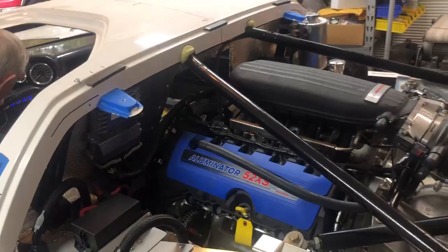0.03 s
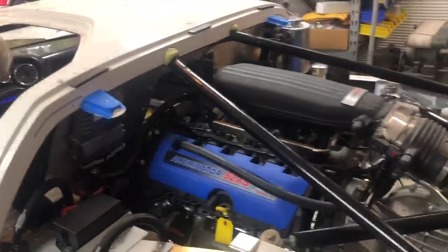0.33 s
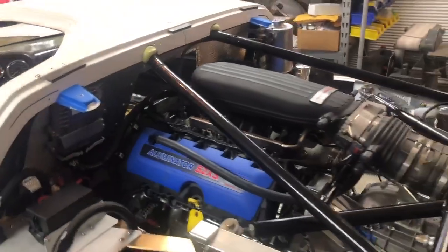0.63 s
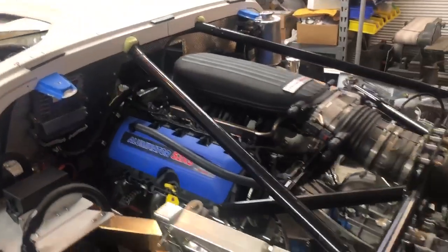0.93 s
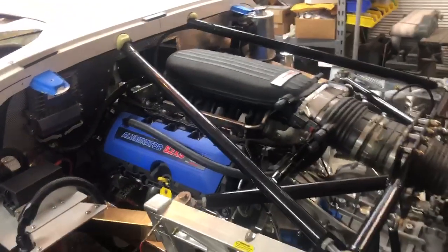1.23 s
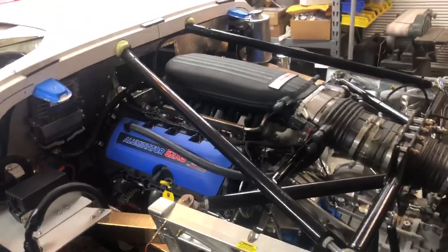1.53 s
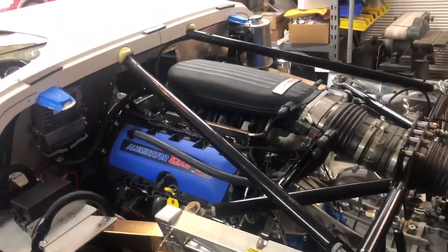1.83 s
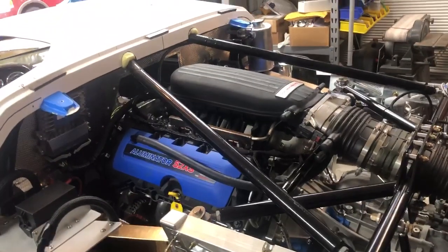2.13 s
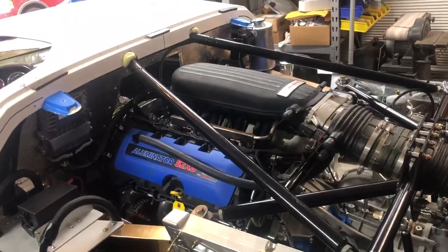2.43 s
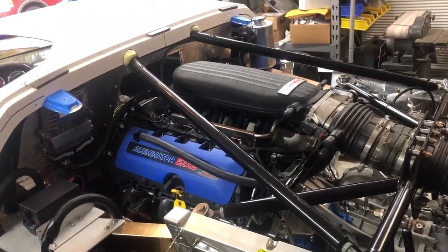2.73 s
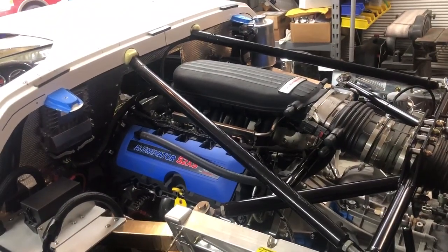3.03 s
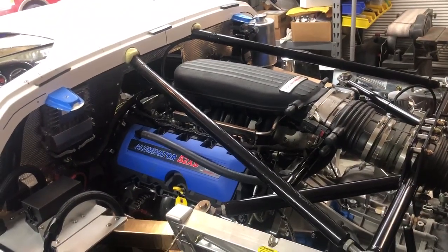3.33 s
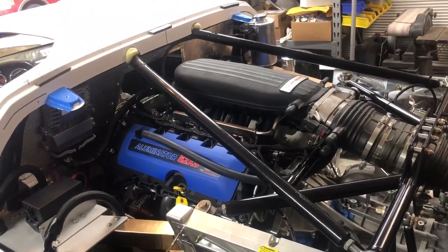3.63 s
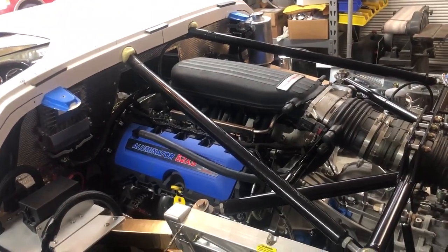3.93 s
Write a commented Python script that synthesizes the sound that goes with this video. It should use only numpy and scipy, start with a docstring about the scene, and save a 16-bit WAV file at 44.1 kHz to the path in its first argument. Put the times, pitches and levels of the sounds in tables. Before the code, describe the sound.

A V8 engine starts up close by in a workshop. First come faint ventilation hum, scattered switch clicks and soft rustling; then the starter slams in, whines and rattles, and the first cylinders bark.

```python
"""Ventilation and mains hum in a quiet workshop, then a V8 starting in its open bay; close, mono.
Switches and relays click; something rustles and squeaks briefly. At 3.56 s the pinion slams in.
The starter's gears whine and rattle, with a falling growl as each compression brakes them.
Cylinder strokes thump the exhaust pipe, and the first to fire bark."""
import sys
import numpy as np
from scipy import signal
from scipy.fft import rfft, irfft
from scipy.io import wavfile
from scipy.ndimage import map_coordinates

SR = 44100
rng = np.random.default_rng(int(sys.argv[2]) if len(sys.argv) > 2 else 0)


def master(y):
    """Save y as 16-bit WAV."""
    cut = np.clip(np.atleast_2d(y).T, -1, 1)
    pcm = np.round(cut * 32767)  # scale
    wavfile.write(sys.argv[1], SR, pcm.astype(np.int16))


N = 176400


def amp(db):
    """Decibels to gain."""
    return 10 ** (np.asarray(db) / 20)


def unit(x):
    """Scale to rms 1."""
    return x / np.sqrt(np.mean(x ** 2) + 1e-20)


def along(points, hz):
    """Interpolate (Hz, value) points on a log axis."""
    point_hz, values = np.transpose(points)
    return np.interp(np.log(hz + 1), np.log(point_hz + 1), values)


def since(s):
    """Seconds since s, zero before."""
    return np.maximum(np.arange(N) / SR - s, 0)


def curves(rows):
    """One value per sample for each column after the time."""
    times_s, *columns = np.transpose(rows)
    return [np.interp(since(0), times_s, column) for column in columns]


def wobble(rate_hz):
    """Smooth random curve, rate_hz knots a second."""
    return map_coordinates(rng.standard_normal(int(N * rate_hz / SR) + 4), [since(0) * rate_hz])


def noise(colour, tilt_db_per_oct=0, ripple_db=0):
    """Coloured noise, rms 1, tilted above 700 Hz; ripple stands for close resonances of metal parts."""
    spacing_hz, bass_corner_hz = 44.83, 960
    hz = np.fft.rfftfreq(N, 1 / SR)
    octaves = np.log2(np.maximum(hz, 700))
    ripple = np.interp(hz / spacing_hz, np.arange(SR), rng.standard_normal(SR))
    ripple *= hz / np.hypot(hz, bass_corner_hz)
    shape_db = along(colour, hz) + tilt_db_per_oct * octaves + ripple_db * ripple
    return unit(irfft(rfft(rng.standard_normal(N)) * amp(shape_db), N))


def decay(s, t60_s, rise_s=0.00045):
    """Quick rise at s, exponential fall."""
    t = since(s)
    return np.exp(-np.log(1000) * t / t60_s) * (1 - np.exp(-t / rise_s))


def ring(s, modes, width):
    """Resonances struck at s, each blurred over width times its frequency."""
    out = np.zeros(N)
    for hz, db, t60_s in modes:
        phase = 2 * np.pi * hz * since(s)
        band = wobble(width * hz) * np.sin(phase) + wobble(width * hz) * np.cos(phase)
        out += amp(db) * decay(s, t60_s, rise_s=0.00051) * band
    return out


def knock(s, colour, tilt_db_per_oct, t60_s, room_db):
    """Dense burst of ringing plus the workshop's tail, whose treble dies first."""
    # Each row: frequency in Hz, room t60 in seconds.
    room = [(200, 1), (2500, 0.34), (7000, 0.25), (14000, 0.2)]
    hz, t, spectra = signal.stft(noise(colour, tilt_db_per_oct, ripple_db=4.5), SR, nperseg=256)
    fall = np.exp(-np.log(1000) * np.maximum(t - s, 0) / along(room, hz)[:, None])
    onset = 1 - np.exp(-since(s) / 0.0018)
    tail = signal.istft(spectra * fall, SR, nperseg=256)[1][:N] * onset
    return noise(colour, tilt_db_per_oct) * decay(s, t60_s) + amp(room_db) * tail


def bay(x, echo_db=-4):
    """Echoes between the bay's metal panels smear a gliding tone into broken strands."""
    echoes = rng.standard_normal(N) * decay(0, t60_s=.07)
    return x + amp(echo_db) * signal.fftconvolve(x, echoes / np.linalg.norm(echoes))[:N]


def workshop():
    """Ventilation and a slightly unsteady mains hum."""
    # Each row: frequency in Hz, relative noise density in dB.
    air_colour = [(25, -54), (48, -11.5), (64, 0), (90, -10), (230, -12.5), (445, -22.5), (950, -21.5),
                  (1600, -29), (3500, -42), (7700, -48), (15500, -43)]
    air_db, hum_hz, hum_db, octave_db = -56, 59.4, -54.5, -12
    phase = 2 * np.pi * hum_hz * since(0) + 0.1 * wobble(22.35)
    hum = np.sin(phase) + amp(octave_db + 2.4 * wobble(5.84)) * np.sin(2 * phase)
    return amp(air_db) * noise(air_colour) + np.sqrt(2) * amp(hum_db) * hum


def handling():
    """Soft rustles and one short, high squeak."""
    # Each row: peak time in seconds, level in dB, rise and fall in seconds per 20 dB.
    rustles = [(.275, -60.5, 0.069, 0.076), (.585, -61.5, 0.027, 0.095), (1.0, -60, 0.17, 0.42),
               (1.224, -55, 0.038, 0.077)]
    # Each row: frequency in Hz, relative level in dB.
    rustle_colour = [(150, -3), (1500, 1), (5000, -5.5), (15000, -18)]
    # Each row: frequency in Hz, relative level in dB, t60 in seconds.
    squeak_modes = [(4130, -4, 0.34), (4400, -5, 0.12), (9220, 0.5, 0.18)]
    squeak_s, squeak_db = 1.091, -53
    t = since(0)
    swell = sum(amp(db - 20 * np.maximum((s - t) / rise_s, (t - s) / fall_s))
                for s, db, rise_s, fall_s in rustles)
    return swell * noise(rustle_colour) + amp(squeak_db) * ring(squeak_s, squeak_modes, width=0.25)


def switches():
    """Switch and relay contacts snap and ring, each at its own pitch; the main switch's body rings too."""
    # Each row: start in seconds, level in dB, tilt in dB/octave, ring pitch in Hz, relative ring in dB.
    clicks = [(0.084, -53, -4.5, 433, -3), (0.275, -61, -5, 4360, -5.5), (0.754, -40, 0.5, 447, -14),
              (2.12, -49, -2, 2650, -10), (3.3415, -47.5, -1.5, 2663, -8), (3.364, -41, 1.5, 4000, -10),
              (3.385, -48.5, 2, 4040, -8), (3.5493, -40.5, 2, 7300, -5)]
    # Each row: frequency in Hz, relative level in dB.
    click_colour = [(100, -25), (300, 4.5), (750, -5), (1500, -4), (2700, -3), (4000, -3.5), (8000, -5),
                    (15500, -12)]
    # Each row: multiple of the ring pitch, relative level in dB, t60 in seconds.
    contact_modes = [(1, 0.5, 0.28), (1.5, -9, 0.39), (1.748, -12, 0.27)]
    # Each row: frequency in Hz, relative level in dB, t60 in seconds.
    main_modes = [(730, -11.5, 0.38), (2830, -14, 0.38), (6850, -1.5, 0.12), (7800, 10, 0.032)]
    main_s, main_db = .755, -42.5
    out = np.zeros(N)
    for s, db, tilt, ring_hz, ring_db in clicks:
        snap = knock(s, click_colour, tilt, t60_s=0.056, room_db=-2.5)
        modes = [(ratio * ring_hz, mode_db, t60_s) for ratio, mode_db, t60_s in contact_modes]
        out += amp(db) * (snap + amp(ring_db) * ring(s, modes, width=.12))
    return out + amp(main_db) * ring(main_s, main_modes, width=0.16)


def pinion():
    """The solenoid throws the pinion into the ring gear; the kick rocks the block on its mounts."""
    # Each row: start in seconds, level in dB, tilt in dB/octave, t60 in seconds.
    slams = [(3.562, -34.5, -4, 0.089), (3.57, -28.5, -5, 0.1), (3.5755, -9.5, 4, 0.016),
             (3.577, -12.5, 6, 0.072), (3.590, -17, -7.5, 0.066)]
    # Each row: frequency in Hz, relative level in dB.
    slam_colour = [(100, -22), (250, -21), (1000, -0.5), (3300, 3), (4800, -6.5), (6200, 1.5), (7500, -7.5),
                   (10000, -5), (11500, -18), (15500, -22)]
    kick_s, kick_db, mount_hz = 3.594, -18, 221
    kick = decay(kick_s, t60_s=0.098, rise_s=0.0022) * np.sin(2 * np.pi * mount_hz * since(kick_s))
    impacts = sum(amp(db) * knock(s, slam_colour, tilt, t60_s, room_db=-8)
                  for s, db, tilt, t60_s in slams)
    return amp(kick_db) * kick + impacts


def starter():
    """Gear whine, backlash knocks tied to the shaft, and grinding teeth."""
    # Each row: time in seconds, gear mesh rate in Hz, whine level in dB.
    run = [(3.67, 1040, -46), (3.69, 1115, -29.5), (3.716, 1228, -24.5), (3.742, 1120, -31.5),
           (3.76, 910, -29), (3.79, 1060, -44), (3.813, 1260, -29), (3.834, 1520, -25), (3.853, 1330, -35),
           (3.875, 1225, -26), (3.89, 1400, -31), (3.908, 1540, -25.5), (3.975, 1530, -24),
           (4.0, 1600, -31)]
    # Each row: multiple of the mesh rate, relative level in dB.
    partials = [(2, 2), (4, -4.5), (5, -3.5), (6, -9.5)]
    # Gear load. Each row: time in seconds, rattle level in dB.
    load = [(3.572, -45), (3.592, -26), (3.71, -25), (3.76, -24), (3.815, -27), (3.87, -24), (4.0, -23.5)]
    # Each row of both: frequency in Hz, relative level in dB.
    rattle_colour = [(30, -15), (110, 0), (160, -8.5), (240, 0.5), (380, -2), (470, -13), (750, -6),
                     (950, 2.5), (1250, 0), (1600, -3.5), (2800, -4), (4500, -15.5), (9000, -39)]
    grind_colour = [(800, -51), (3500, 0.5), (6500, 0.5), (10500, -10), (15500, -16)]
    teeth, knock_t60_s, grind_db = 11, 0.03, -4.5
    roughness, squeal_fade_db_per_s = .45, 42
    mesh_hz, whine_db = curves(run)
    rattle_db, = curves(load)
    turning = since(load[0][0]) > 0

    chatter = .06 * (mesh_hz / mesh_hz.max()) ** 10  # pitch jitter grows with speed
    cycles = np.cumsum(mesh_hz * (1 + chatter * wobble(600))) / SR
    squeal = amp(-squeal_fade_db_per_s * since(run[0][0]))  # upper partials fade as the pinion seats
    whine = np.zeros(N)
    for k, db in partials:
        gain = amp(db) * (squeal if k > 2 else 1) * (1 + roughness * wobble(350))
        whine += gain * np.sin(2 * np.pi * round(k) * cycles)

    shaft_turns = cycles / teeth + 0.201 * wobble(90)
    since_knock_s = (shaft_turns % 1) * teeth / mesh_hz
    knocks = np.exp(-np.log(1000) * since_knock_s / knock_t60_s)
    metal = noise(rattle_colour, ripple_db=4.5) + amp(grind_db) * noise(grind_colour, ripple_db=4.5)
    rattle = unit(1 + knocks) * metal  # steady grinding under the knocks
    return bay(turning * amp(whine_db) * whine) + turning * amp(rattle_db) * rattle


def frame():
    """The frame drones unsteadily once the crank turns freely."""
    start_s, hz, db = 3.74, 289.7, -30.5
    sway_db, sway_rad = 2.5, .6
    onset = np.minimum(since(start_s) * hz, 1)
    gain = onset * amp(db + sway_db * wobble(40))
    return gain * np.sin(2 * np.pi * hz * since(0) + sway_rad * wobble(40))


def growl():
    """A rough tone that sinks as each compression brakes the starter."""
    # Each row: start in seconds, level in dB.
    compressions = [(3.596, -29), (3.638, -24.5), (3.678, -28), (3.752, -25), (3.830, -19), (3.918, -22)]
    start_hz, sag_oct_per_s, roughness = 1200, 7, .55
    out = np.zeros(N)
    for s, db in compressions:
        cycles = np.cumsum(start_hz * 2 ** (-sag_oct_per_s * since(s))) / SR
        tone = np.sin(2 * np.pi * cycles + roughness * wobble(300)) * (1 + roughness * wobble(300))
        out += amp(db) * decay(s, t60_s=.2, rise_s=.008) * tone
    return bay(out)


def cylinders():
    """Each stroke thumps the exhaust pipe; those that fire also bark."""
    # Each row: start in seconds, thump level in dB, bark level in dB.
    strokes = [(3.718, -24.5, -53), (3.83, -23, -17.5), (3.847, -29, -23.5), (3.883, -29, -27),
               (3.923, -26.5, -17.5), (3.978, -32, -17.5)]
    # Each row: frequency in Hz, relative level in dB.
    bark_colour = [(100, -22), (400, -9), (1200, -1), (4000, -12.5), (7000, -13.5), (15500, -34)]
    pipe_hz, flutter_db = 70.5, 4.84
    out = np.zeros(N)
    for s, thump_db, bark_db in strokes:
        pulse = decay(s, 0.16, 0.023) ** 2
        pulse /= pulse.max() + 1e-9
        out += amp(thump_db) * pulse * np.sin(2 * np.pi * pipe_hz * since(s))
        bark = amp(flutter_db * wobble(500)) * noise(bark_colour, ripple_db=4.5)
        out += amp(bark_db) * decay(s, t60_s=0.12, rise_s=0.0055) * bark
    return out


def scene():
    """All sources at one microphone, the same on both channels."""
    mono = workshop() + switches() + handling() + pinion() + starter() + frame() + growl() + cylinders()
    return np.array([mono, mono])


def record(dry):
    """The band-limited microphone comes on just after the start."""
    on_s, top_hz = .083, 15750
    lowpass = signal.cheby1(14, .1, top_hz, fs=SR, output="sos")
    return signal.sosfilt(lowpass, dry * (since(on_s) > 0))


dry = scene()
out = record(dry)
master(out)
```